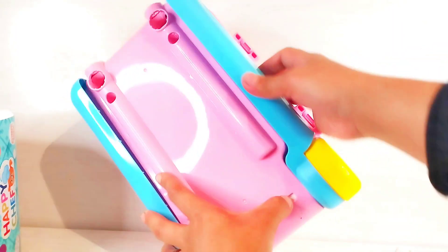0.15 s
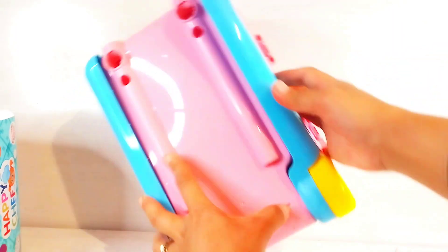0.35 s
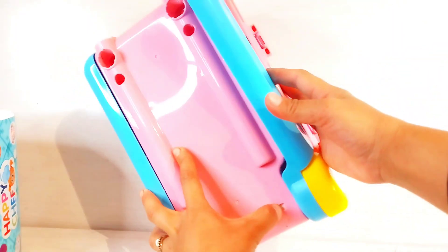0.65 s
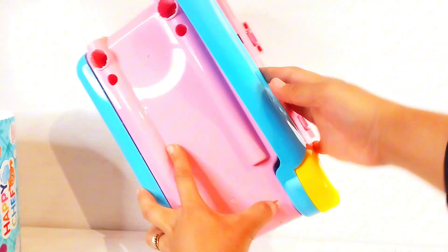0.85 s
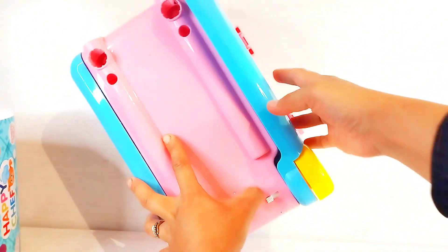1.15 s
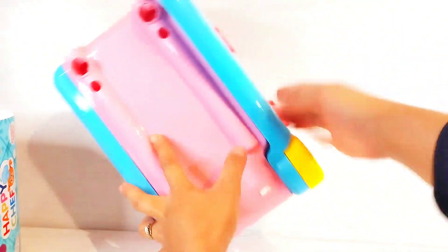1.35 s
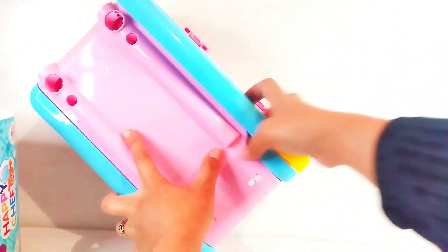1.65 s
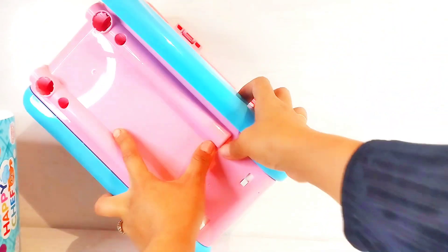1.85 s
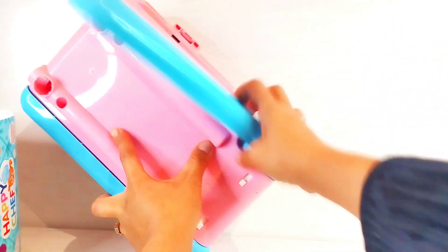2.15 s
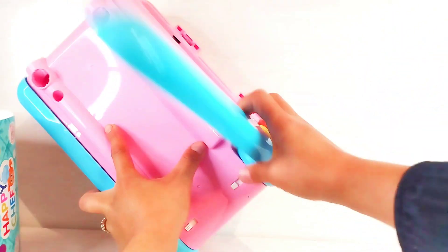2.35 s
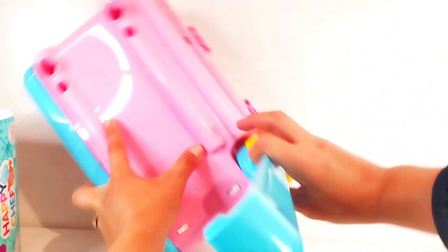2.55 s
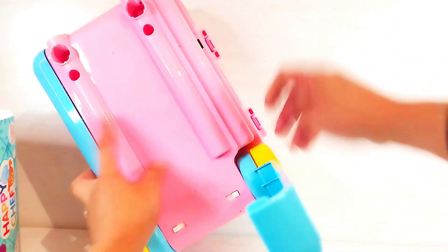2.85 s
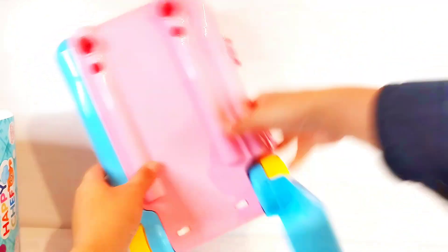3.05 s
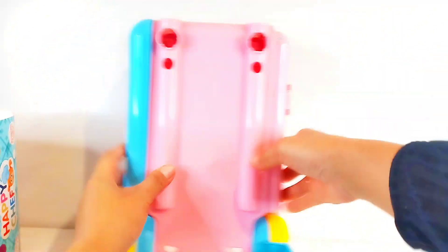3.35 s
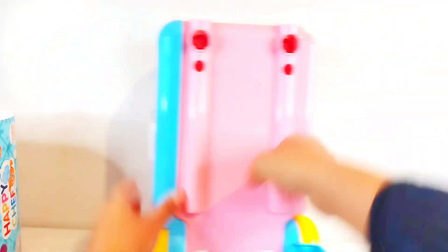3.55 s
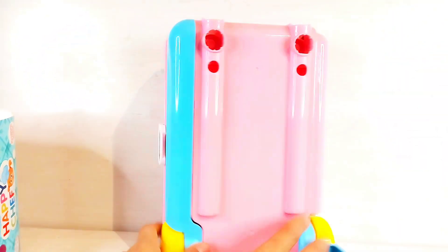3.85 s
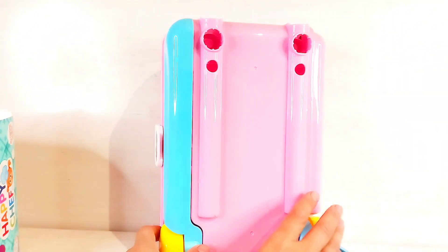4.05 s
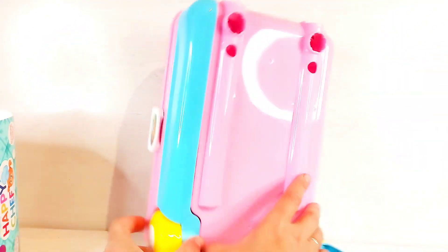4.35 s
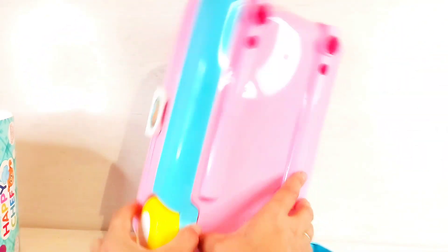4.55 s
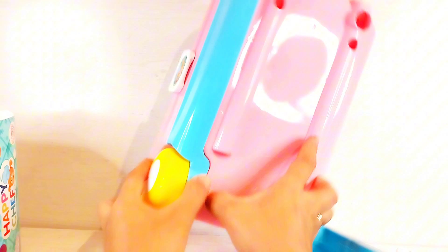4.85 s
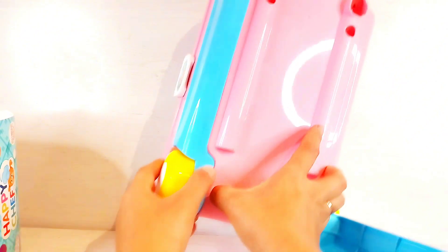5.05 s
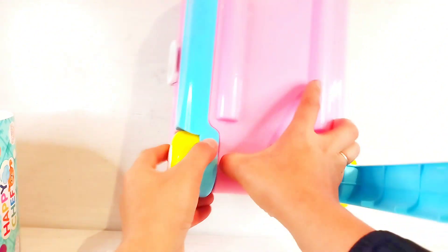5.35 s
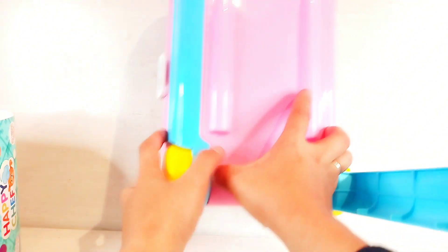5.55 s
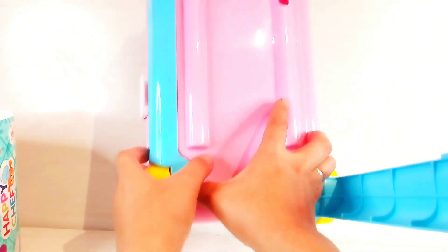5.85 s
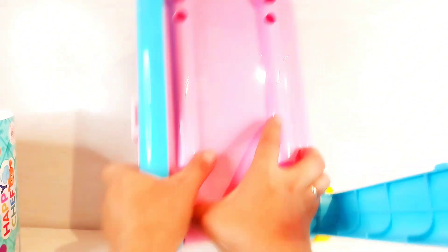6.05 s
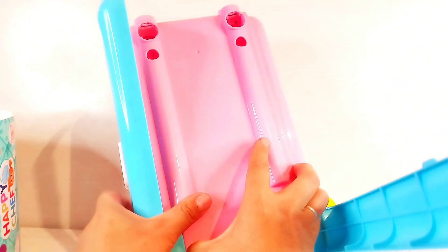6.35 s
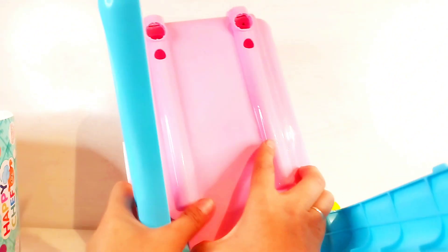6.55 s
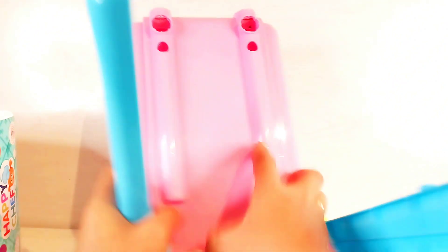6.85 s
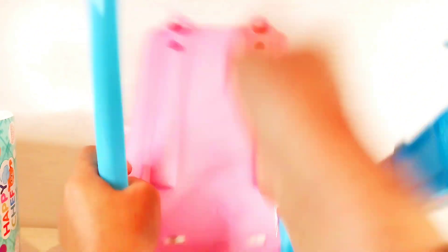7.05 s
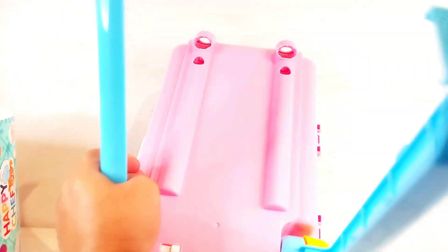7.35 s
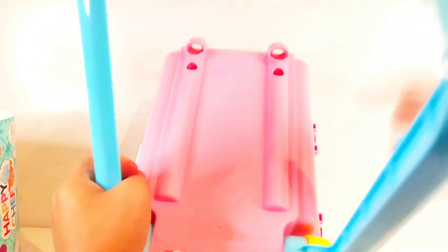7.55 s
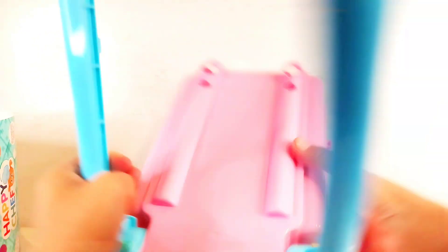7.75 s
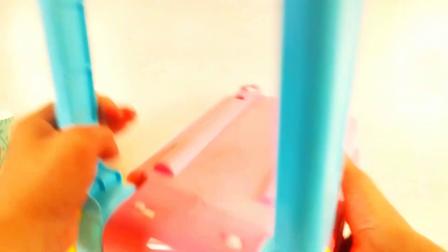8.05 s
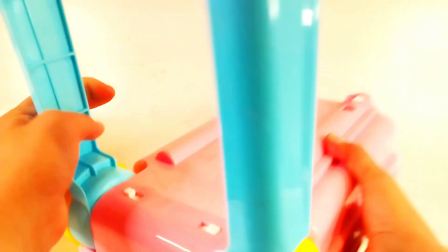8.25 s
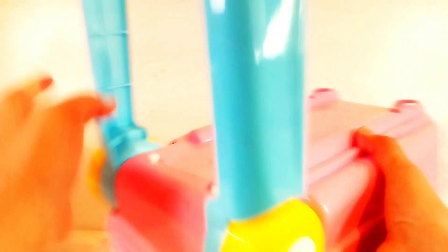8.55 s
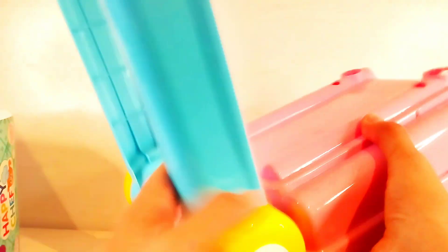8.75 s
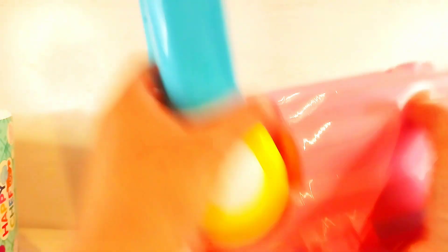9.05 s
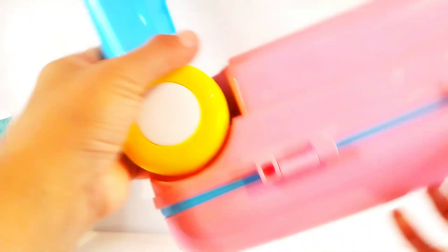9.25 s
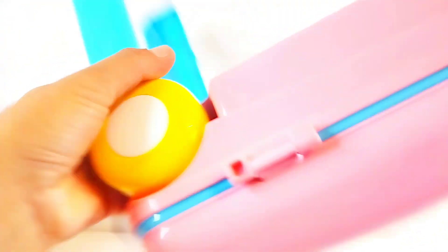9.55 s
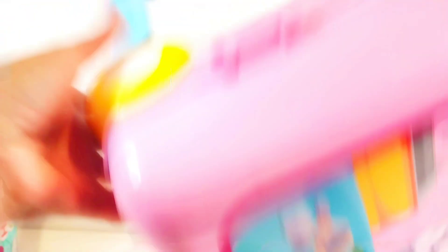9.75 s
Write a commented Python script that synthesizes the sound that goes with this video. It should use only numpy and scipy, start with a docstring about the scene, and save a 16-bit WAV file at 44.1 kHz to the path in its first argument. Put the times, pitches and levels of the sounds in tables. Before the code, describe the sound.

Close handling of a hollow plastic toy in a small room: dull knocks, heavy thumps, scraping hands, and catches snapping open.

```python
"""Unfolding a hollow plastic toy

A hollow plastic toy case is turned over on a table in a small room and its hinged legs are unfolded, close by.
Each contact adds a table thump and a shell knock (dying or damped swings), and a wall clack and an edge tick (shaped noise).
Catches snap, and ringing made of dying tones follows three of the snaps.
Rubbing, scraping and dragging are tiny random clicks over hiss; loose contents rattle after each knock.
Room echoes and a faint steady background noise surround it all."""
import sys
import numpy as np
from scipy import signal
from scipy.io import wavfile
from scipy.ndimage import uniform_filter1d

SR = 44100
rng = np.random.default_rng(int(sys.argv[2]) if len(sys.argv) > 2 else 0)


def digitize_waveform(pressure):
    """Quantize a signal to 16-bit integers and store it at the path in sys.argv[1].

    Rows of a 2-D input are taken as channels; values are limited to [-1, 1].
    """
    field = np.atleast_2d(pressure).T
    bounded = np.clip(field, -1, 1)
    quanta = np.round(bounded * 32767).astype(np.int16)
    wavfile.write(sys.argv[1], SR, quanta)


N = 436577

# Tone colour of the background noise. Each row: frequency in Hz, relative level in dB.
HUSH_COLOUR = [(15, -27), (25, -9), (123, -17.5), (256, 2), (384, -2), (575, -18), (695, -37.5),
               (1190, -31), (2550, -25), (6050, -31.5), (8140, -37.5), (9840, -31), (11000, -36),
               (13600, -26), (16000, -38)]
HUSH_DB = -53.5

# Main reverberation of the room. Each row: frequency in Hz, time to fade by 60 dB in seconds.
ROOM_FADE = [(70, 0.32), (300, 0.9), (1000, 0.37), (2200, 0.78), (5000, 0.58), (9000, 0.73), (15000, 0.37)]
# Tone colour of that reverberation. Each row: frequency in Hz, relative level in dB.
ROOM_COLOUR = [(70, 1.5), (300, -6.5), (900, -1.5), (1600, 5.5), (2500, -2), (5000, -0.5), (9000, -1.5),
               (15000, 1)]
# Single early echoes. Each row: delay in seconds, gain as a plain factor (negative flips the wave).
ECHOES = [(0.0102, -0.11), (0.013, 0.14), (.0205, 0.11), (0.0255, 0.044)]
EDGE_HZ = 16150  # upper limit of the final sound

# Tone colours of the friction sounds. Each row: frequency in Hz, relative level in dB.
RUB_COLOUR = [(25, 6.5), (60, -1.5), (140, -1), (185, 4.5), (280, 4.5), (420, 4), (580, -1), (750, -8.5),
              (1100, -17.5), (2000, -33), (5000, -78)]
SCRAPE_COLOUR = [(300, -35), (900, -15), (1300, 3), (2300, 3.5), (3600, -3), (4700, -4.5), (6700, -10),
                 (8200, -23.5), (9800, -15), (11200, -21.5), (13000, -16), (15800, -10.5)]
DRAG_COLOUR = [(18, -8), (35, 5), (66, 15.5), (100, 11), (150, -5), (300, -37.5)]
# A hand slides to a new hold or works a hinge.
# Each row: start in seconds, length in seconds, palm rubbing in dB, plastic scraping in dB.
STROKES = [(0, 0.31, -42.5, -57.5), (0.946, 0.27, -40.5, -56.5), (1.179, 0.095, -40, -44.5),
           (1.357, 0.17, -36.5, -52), (1.56, .1, -28, -41.5), (1.661, 0.34, -41.5, -61),
           (2.222, 0.17, -37, -51.5), (2.466, 0.34, -42.5, -54), (2.6, 0.063, -22, -44),
           (3.027, 0.33, -44.5, -51.5), (3.186, 0.16, -32.5, -63), (3.414, 0.21, -24, -40.5),
           (3.639, 0.58, -36, -57), (4.218, 0.35, -33, -56.5), (4.77, 0.23, -35.5, -46.5),
           (4.955, 0.71, -42, -57.5), (5.665, 0.33, -45, -67), (6.094, 0.095, -30, -42),
           (6.176, 0.3, -43, -56), (6.37, .12, -23.5, -48), (6.485, 0.35, -39.5, -55.5),
           (7.128, 0.26, -38, -60), (7.327, .2, -35, -61), (7.524, 0.24, -45, -70),
           (7.653, 0.38, -38, -56.5), (8.25, .17, -44.5, -50.5), (8.499, .19, -50, -55.5),
           (8.72, 0.14, -42, -59), (9.115, 0.31, -55, -60.5), (9.493, .11, -49, -52.5),
           (9.63, 0.28, -44.5, -63.5)]
STROKE_EDGE_S = 0.064  # a stroke takes this long to get going, and to stop
HOLD_RUB_DB, HOLD_SCRAPE_DB = -52, -79  # the hands are never quite still
# The whole case is dragged over the table. Each row: start in seconds, length in seconds, level in dB.
DRAGS = [(2.2, 0.28, -52), (3.3, 0.51, -33), (4.82, 0.206, -45), (5.12, 0.13, -42), (7.66, 0.27, -39)]
PUSH_DB = -12.5  # drag relative to the palms: any push on the shell shifts the case a little too

# After each contact the loose contents rattle, in proportion to the knock:
# dull against the shell, bright against each other. Levels are relative to the knock.
RATTLE_RISE_S, DULL_DB, DULL_FALL_S, BRIGHT_DB, BRIGHT_FALL_S = 0.023, -19, 0.11, -30, 0.052

# Natural tones (modes) of the table, of the hollow shell, and of the ringing after a snap.
# Each row: base frequency in Hz, relative level in dB, time to fade by 60 dB in seconds (the ringing's gets stretched).
TABLE_MODES = [(66.73, -0.5, 0.89), (83.5, 5.5, 0.2), (105, -19, 0.065), (117.6, -35, .4), (186, 3, 0.33)]
SHELL_MODES = [(199.5, -1.5, 0.11), (272.5, 1.5, 0.18), (346, -9.5, 0.087), (406.4, -7.5, 0.12),
               (478, 1, 0.1), (587, 3.5, 0.075), (743, -3.5, 0.056), (834, -2, 0.066)]
RINGING_MODES = [(1527, -2, 0.37), (1660, -7, 0.42), (1718, -4.5, 0.24), (1910, -7, 0.22), (2060, -4, 0.56),
                 (2340, -5, 0.11), (2240, 7.5, 0.16), (2620, -10, 0.21), (2800, -16, 0.55),
                 (3320, -10, .22), (3910, -13, 0.28), (4580, -24, 0.34), (4840, -11, 0.28),
                 (6611, -18, 0.3)]
# Tone colours of the thin walls and the hard edges. Each row: frequency in Hz, relative level in dB.
CLACK_COLOUR = [(300, -22), (700, 2), (950, 8), (1250, 2), (1600, 4), (2300, 1.5), (3000, -3.5),
                (3700, -6.5), (4600, -8.5), (5400, -9), (6700, -15.5), (8000, -28.5), (11000, -33)]
TICK_COLOUR = [(3000, -65), (6000, 6.5), (8300, -10.5), (9800, -0.5), (11200, -7.5), (12800, 5.5),
               (15400, -5), (16200, 0)]

# The case bumps against the table or a hand.
# Each row: time in seconds, table thud in dB, shell knock in dB, knock pitch in Hz, wall clack in dB.
BUMPS = [(0.127, -48, -34, 268, -68), (.297, -21.5, -21.5, 171.8, -37.5), (.377, -26.5, -19, 266.3, -42.5),
         (.445, -33, -35, 233, -69), (.545, -22, -17.5, 233, -41), (1.071, -30.5, -36, 306, -46),
         (1.117, -39, -26, 345, -60), (1.223, -55, -30, 414, -39.5), (1.364, -31, -34.5, 336, -55),
         (1.427, -28, -25.5, 400, -55), (1.509, -39, -11, 360, -29), (1.515, -17, -17.5, 365, -34),
         (1.536, -32, -21, 316, -31.5), (1.569, -29, -20.5, 455, -30.5), (1.694, -31.5, -26, 286, -41.5),
         (1.98, -47, -33, 304, -46), (2.166, -38, -32, 336, -49.5), (2.437, -53, -37.5, 262, -77),
         (2.77, -36, -32.5, 272.6, -66.5), (2.85, -25.5, -17, 387, -38.5), (2.97, -53, -30.5, 238, -68),
         (3.076, -36, -35.5, 237, -62), (3.202, -34, -29.5, 363, -45), (3.377, -18, -23.5, 426, -37),
         (3.408, -2.5, -11.5, 236, -23.5), (3.426, -7.5, -7, 319, -26.5), (3.461, -21, -19, 392, -32),
         (3.5145, -24, -15, 474, -24), (3.558, -21, -17, 358, -41), (3.723, -39, -24, 385, -42.5),
         (3.744, -22, -28, 292, -42), (3.795, -54, -28, 452, -49), (3.838, -51, -27, 326, -53),
         (4.029, -54, -32.5, 486, -61), (4.181, -36, -30.5, 273, -52), (4.302, -39, -26.5, 521, -43.5),
         (4.317, -50, -27, 330, -40.5), (4.392, -22, -11.5, 348, -30.5), (4.406, -39, -23, 317, -43),
         (4.49, -33, -31.5, 546, -48), (4.657, -30.5, -31, 254.8, -48), (4.947, -28, -23, 523, -35),
         (5.686, -49, -29.5, 333, -65), (6.369, -15.5, -15.5, 217, -28.5), (6.38, -28, -14, 205, -45),
         (6.418, -26, -20.5, 473, -40.5), (6.442, -43.5, -23, 486, -39), (6.606, -30, -23.5, 339.4, -46),
         (6.653, -28, -27.5, 431, -65), (7.081, -44, -36, 272, -56), (7.2324, -10.5, -7, 337, -22),
         (7.265, -16.5, -18, 314, -49), (7.283, -15, -17.5, 300, -36), (7.688, -52, -30, 340, -53),
         (7.728, -33, -25.5, 314, -60), (7.775, -43, -28, 274, -44), (7.948, -25, -20.5, 386, -41.5),
         (7.995, -32, -26, 330, -39.5), (8.454, -54, -33, 273, -47)]
# A bump's clack is dull, with one fixed emphasis near 900 Hz; its tick is weak (relative to the clack).
DULL_CLACK_HZ, BUMP_TICK_DB = 910, -22.5
# Small hard parts click together.
# Each row: time in seconds, shell knock in dB, wall clack in dB, clack emphasis in Hz, edge tick in dB.
CLICKS = [(.298, -30, -38.5, 2550, -62), (.384, -26.5, -42, 3600, -53), (.648, -54, -50.5, 2240, -76),
          (1.043, -35.5, -42, 3780, -50), (1.098, -30.5, -41, 880, -58), (1.829, -37, -49.5, 3130, -70),
          (1.883, -30.5, -36, 1860, -49), (2.61, -29.5, -37, 2065, -52), (3.346, -32, -36.5, 5520, -47),
          (3.409, -17, -33, 5400, -37), (3.59, -25.5, -32.5, 2430, -64), (4.089, -42, -43, 3440, -44.5),
          (4.678, -29.5, -39.5, 1780, -55), (4.807, -23.5, -33, 2420, -40), (5.633, -27, -31, 2560, -68),
          (5.698, -33, -39.5, 3950, -56), (5.73, -43, -47, 1710, -72), (5.869, -36, -46.5, 2240, -77),
          (6.036, -46, -30.5, 2160, -52), (6.041, -23, -39.5, 2140, -62), (6.107, -31, -35.5, 2680, -70),
          (6.129, -28.5, -37.5, 2280, -47), (6.277, -33.5, -45, 2500, -57),
          (6.709, -50, -42.5, 6100, -46.5), (6.957, -40, -48, 2630, -79), (7.578, -37.5, -54, 2510, -67),
          (7.729, -35, -47.5, 6100, -46.5), (7.831, -31.5, -40.5, 1600, -44.5),
          (8.205, -32, -46, 1630, -49), (8.816, -35, -43.5, 6230, -52), (9.0148, -24.5, -29.5, 5670, -38),
          (9.634, -30.5, -45, 3520, -57.5), (9.775, -29.5, -36.5, 5970, -42.5),
          (9.868, -50, -46, 4010, -72)]
# A click barely reaches the table (thud relative to the knock).
CLICK_KNOCK_HZ, CLICK_THUD_DB = 369, -18
# Catches snap. Each row: time in seconds, table thud in dB, shell knock in dB, knock pitch in Hz,
# wall clack in dB, clack emphasis in Hz, edge tick in dB.
SNAPS = [(2.6135, -25, -16.5, 784, -16.5, 1960, -28.5), (4.7474, -33, -10, 392, -25.5, 2300, -30.5),
         (6.157, -36, -18, 340, -20, 2620, -38), (8.184, -38, -25.5, 448, -14, 3440, -23.5),
         (9.019, -42.5, -25.5, 400, -24.5, 2470, -41)]
# A clack gives little below this share of its emphasis frequency, up to a limit.
STIFF_SHARE, STIFF_TOP_HZ = 0.55, 1450
# Ringing after a snap: leg tones at 4.7465 s, a room-like ring near 2 kHz at 6.157 s and 8.184 s.
# Each row: time in seconds, level in dB, stretch of the fade time as a factor, lift of upper modes in dB per octave.
RINGINGS = [(4.7465, -23, 0.9, 5.5), (6.157, -37, 1.3, -5), (8.184, -34, 2.9, 0)]


def amp(db):
    """Turns decibels into a gain."""
    return 10 ** (np.asarray(db) / 20)


def evened(x):
    """Scales a steady sound to an average (rms) strength of 1."""
    return x / np.sqrt(np.mean(x ** 2) + 1e-20)


def blow(x):
    """Scales a short sound to the energy of a hundredth of a second at rms 1."""
    return x / np.sqrt(np.sum(x ** 2) * 100 / SR + 1e-20)


def read(points, hz):
    """Reads a table between its rows, on a logarithmic frequency axis."""
    f, value = np.transpose(points)
    return np.interp(np.log(hz + 1), np.log(f + 1), value)


def add(mix, s, sound):
    """Mixes a sound in at time s (seconds), cutting off what runs past the end."""
    part = mix[max(round(s * SR), 0):][:len(sound)]
    part += sound[:len(part)]


def colour(points, spot_hz=1000, spot_db=0, size=4096):
    """Makes a filter response with the given tone colour, and a broad boost around spot_hz if wanted."""
    hz = abs(np.fft.fftfreq(size, 1 / SR))
    octaves_away = np.log2((hz + 1) / spot_hz)
    db = read(points, hz) + spot_db / (1 + (octaves_away / 0.26) ** 2)
    # the Hilbert step finds the phase that puts the sound after the blow, not before it
    spectrum = np.exp(np.conj(signal.hilbert(np.log(amp(db)))))
    return np.fft.ifft(spectrum).real[:size // 2]


def through(x, response):
    """Passes a sound through a filter response."""
    return signal.oaconvolve(x, response)[:len(x)]


def cut(x, hz, kind, order=2):
    """Keeps mainly what lies below ("low") or above ("high") a frequency."""
    return signal.sosfilt(signal.butter(order, hz, kind, fs=SR, output="sos"), x)


def hush():
    """Faint background: steady random noise, tone-coloured."""
    return amp(HUSH_DB) * evened(through(rng.standard_normal(N), colour(HUSH_COLOUR)))


def room(x, early_db, early_t60, late_db, onset_s):
    """Single reflections, a quick scatter from nearby things, and the longer tail of the room."""
    t = np.arange(SR) / SR
    swell = 1 - np.exp(-(t / onset_s) ** 2)
    early = rng.standard_normal(SR) * swell * amp(-60 * t / early_t60)
    early = through(early, colour([(100, -4), (700, -3), (2500, 0), (6000, -1), (14000, -4)]))
    # in the tail, each frequency fades at its own speed
    hz, when, z = signal.stft(rng.standard_normal(SR), SR, nperseg=256)
    fade_db = read(ROOM_COLOUR, hz)[:, None] - 60 * when / read(ROOM_FADE, hz)[:, None]
    late = signal.istft(z * amp(fade_db), SR, nperseg=256)[1][:SR] * swell
    response = amp(early_db) * early / np.linalg.norm(early)
    response += amp(late_db) * late / np.linalg.norm(late)
    for s, gain in ECHOES:
        response[int(s * SR)] += gain
    return through(x, response)


def slips(per_s, spread_db, hiss):
    """Stick-slip friction: many tiny clicks of uneven size over a smooth hiss."""
    size = amp(spread_db * np.minimum(rng.exponential(1, N), 4)) * rng.choice([-1, 1], N)
    clicks = evened(size * (rng.random(N) < per_s / SR))
    return evened(clicks + hiss * rng.standard_normal(N))


def wander(x, patchy_db):
    """The rubbing spot moves, so patches of the spectrum swell and fade."""
    z = signal.stft(x, nperseg=512, noverlap=384)[2]
    patches = uniform_filter1d(rng.standard_normal(z.shape), size=7, axis=0)  # smooth over frequency
    patches = uniform_filter1d(patches, size=12, axis=1)  # smooth over time
    return evened(signal.istft(z * amp(patchy_db * evened(patches)), nperseg=512, noverlap=384)[1][:N])


def moves(rows):
    """Power of movements (start s, length s, dB): each gets going, holds and stops."""
    power = np.zeros(N)
    for s, length, db in rows:
        t = np.arange(0, length, 1 / SR)
        shape = np.minimum(np.minimum(t, length - t) / STROKE_EDGE_S, 1)
        add(power, s, (amp(db) * shape) ** 2)
    return power


def blows():
    """Lists bumps, clicks and snaps, each as (s, thud dB, knock dB, knock Hz, clack dB, clack Hz, tick dB)."""
    bumps = [(s, thud_db, knock_db, hz, clack_db, DULL_CLACK_HZ, clack_db + BUMP_TICK_DB)
             for s, thud_db, knock_db, hz, clack_db in BUMPS]
    clicks = [(s, knock_db + CLICK_THUD_DB, knock_db, CLICK_KNOCK_HZ, clack_db, hz, tick_db)
              for s, knock_db, clack_db, hz, tick_db in CLICKS]
    return bumps + clicks + SNAPS


def rattles(db, fall_s):
    """Power of the loose contents: every knock shakes them up, then they settle."""
    t, power = np.arange(SR) / SR, np.zeros(N)
    settle = ((1 - np.exp(-t / RATTLE_RISE_S)) * np.exp(-t / fall_s)) ** 2
    for s, _, knock_db, *_ in blows():
        add(power, s, amp(knock_db + db) ** 2 * settle)
    return power


def handling():
    """Palms rub the shell, plastic scrapes on plastic, the contents rattle, and the case drags on the table."""
    rub = wander(through(slips(per_s=220, spread_db=4.0, hiss=0.99), colour(RUB_COLOUR)), patchy_db=3.0)
    scrape = wander(through(slips(per_s=270, spread_db=5.5, hiss=1.0), colour(SCRAPE_COLOUR)), patchy_db=5.0)
    drag = evened(through(slips(per_s=80, spread_db=-3, hiss=0.79), colour(DRAG_COLOUR)))
    palms = amp(HOLD_RUB_DB) ** 2 + moves([(s, length, db) for s, length, db, _ in STROKES])
    plastic = amp(HOLD_SCRAPE_DB) ** 2 + moves([(s, length, db) for s, length, _, db in STROKES])
    dragging = moves(DRAGS) + amp(PUSH_DB) ** 2 * palms
    # powers add up; their square root is the loudness curve
    return (rub * np.sqrt(palms + rattles(DULL_DB, DULL_FALL_S))
            + scrape * np.sqrt(plastic + rattles(BRIGHT_DB, BRIGHT_FALL_S))
            + drag * np.sqrt(dragging))


def ring(modes, t, spread_db, detune):
    """Dying tones; the spot struck and the grip shift their strength and pitch a little, at random."""
    chance = rng.uniform(-1.48, 1, (len(modes), 2))
    return sum(amp(db + spread_db * a - 60 * t / t60) * np.sin(2 * np.pi * hz * (1 + detune * b) * t)
               for (hz, db, t60), (a, b) in zip(modes, chance))


def push(t, hz, cycles):
    """A heavily damped swing that swells for the given number of cycles."""
    u = t * hz / cycles
    return u * np.exp(-u) * np.sin(2 * np.pi * hz * t)


def chatter(t, rise_s, fall_s, linger_db, linger_s, bounce):
    """Crowded wall tones as noise: a crack, a rebound a few milliseconds later, and a weaker rattle."""
    rise = 1 - np.exp(-t / rise_s)
    crack = rise * np.exp(-t / fall_s)
    rebound = bounce * np.interp(t - rng.uniform(0.0032, 0.0034), t, crack)
    rattle = amp(linger_db) * rise * np.exp(-t / linger_s)
    return rng.standard_normal(len(t)) * (np.hypot(crack, rebound) + rattle)


def thud(t):
    """The whole case pushes on the table, which booms on."""
    boom = blow(ring(TABLE_MODES, t, spread_db=0.0, detune=0.0029) * (1 - np.exp(-t / 0.0012)))
    shove = blow(push(t, hz=108, cycles=0.32))
    return cut(amp(-4.0) * shove + amp(-4) * boom, 64.3, "high", order=3)


def knock(t, hz):
    """The hollow shell swings a few times; a soft, slow blow cannot wake its upper modes."""
    modes = ring(SHELL_MODES, t, spread_db=2, detune=0.032) * (1 - np.exp(-t / 0.0011))
    modes = blow(cut(modes, 1.94 * hz, "low"))
    swing = blow(push(t, hz, cycles=0.6) * (1 - np.exp(-t / 0.0061)))  # the wall takes a moment to bend
    overtone = blow(push(t, 2.09 * hz, cycles=0.92))  # the second bending shape of the same wall
    shell = amp(-1.5) * swing + amp(-15.0) * overtone + amp(-3.5) * modes
    return cut(cut(shell, 1130, "low"), 149, "high")


def clack(t, spot_hz, slide):
    """Thin walls crack and rattle as noise, with a broad boost around spot_hz; slide stretches the crack."""
    noise = chatter(t, rise_s=0.00037 * slide, fall_s=0.0027 * slide, linger_db=-22.5, linger_s=0.017, bounce=0.25)
    noise = cut(noise, min(spot_hz * STIFF_SHARE, STIFF_TOP_HZ), "high")
    return blow(through(noise, colour(CLACK_COLOUR, spot_hz, spot_db=min(3.9 * slide, 6))))


def tick(t, slide, edge):
    """A hard edge gives a very short, bright burst of noise; slide softens its start."""
    noise = chatter(t, rise_s=0.000089 * slide, fall_s=0.0032, linger_db=-22, linger_s=0.0093, bounce=0.16)
    return blow(through(noise, edge))


def ringing(t, stretch, lift_db):
    """Ringing after a snap: a set of dying tones, with fade times stretched and upper tones lifted or lowered."""
    modes = [(hz, level + lift_db * np.log2(hz), t60 * stretch) for hz, level, t60 in RINGING_MODES]
    return blow(ring(modes, t, spread_db=3, detune=0.0013))


def contacts():
    """Every contact drives the table, the hollow shell, the thin walls and a hard edge; ringing follows some."""
    t, out = np.arange(SR * 3 // 5) / SR, np.zeros(N)
    short, edge = t[:len(t) // 4], colour(TICK_COLOUR)
    for s, thud_db, knock_db, knock_hz, clack_db, clack_hz, tick_db in blows():
        slide = amp(-0.25 * (clack_db + 21))  # light touches slide, so they last longer than hard snaps
        add(out, s, amp(thud_db) * thud(t))
        add(out, s, amp(knock_db) * knock(short, knock_hz))
        add(out, s, amp(clack_db) * clack(short, clack_hz, slide))
        add(out, s, amp(tick_db) * tick(short, slide, edge))
    for s, db, stretch, lift_db in RINGINGS:
        add(out, s, amp(db) * ringing(t, stretch, lift_db))
    return out


def scene():
    """The toy, its room and the background noise."""
    toy = handling() + contacts()
    echoes = room(toy, early_db=-10.5, early_t60=0.29, late_db=-15.5, onset_s=0.01)
    return (toy + echoes + hush())[None]


def record(dry):
    """Peaks beyond full scale overload and are cut flat; then a filter removes the highest treble."""
    low_pass = signal.firwin(401, EDGE_HZ, window=("kaiser", 9), fs=SR)
    return signal.oaconvolve(np.clip(dry, -1, 1), low_pass[None], "same")


dry = scene()
out = record(dry)
digitize_waveform(out)
```